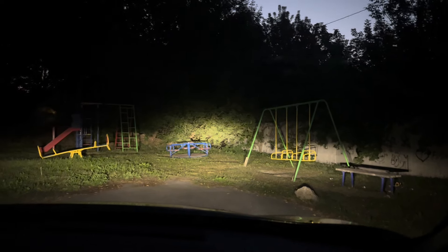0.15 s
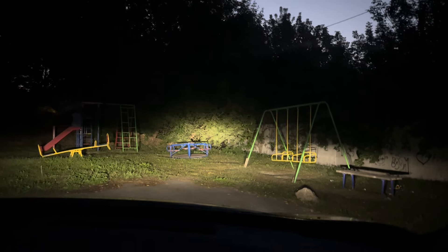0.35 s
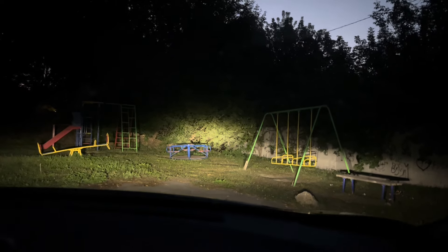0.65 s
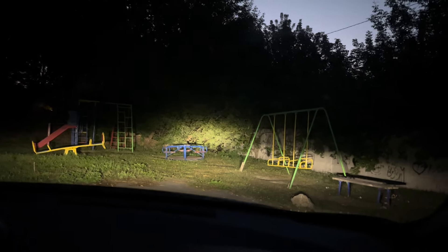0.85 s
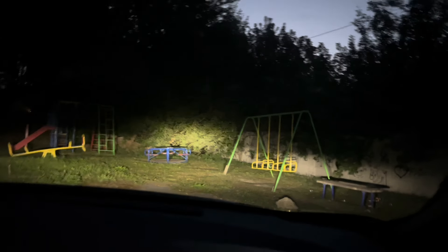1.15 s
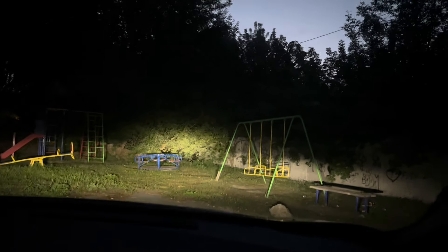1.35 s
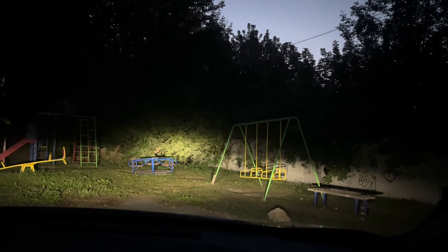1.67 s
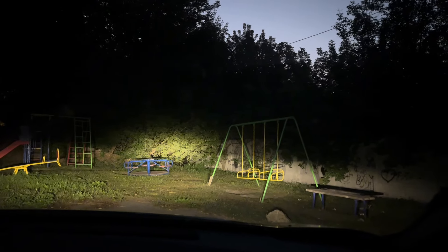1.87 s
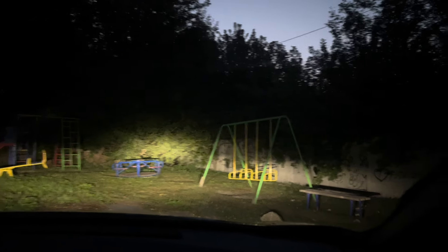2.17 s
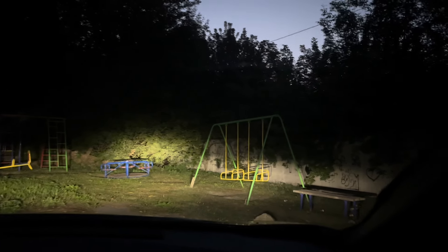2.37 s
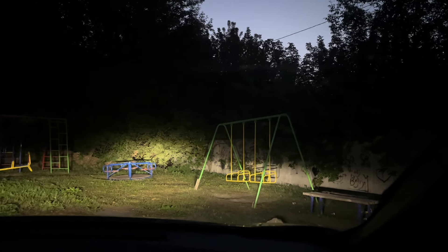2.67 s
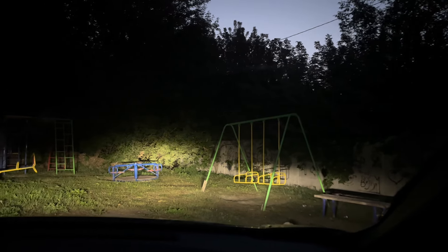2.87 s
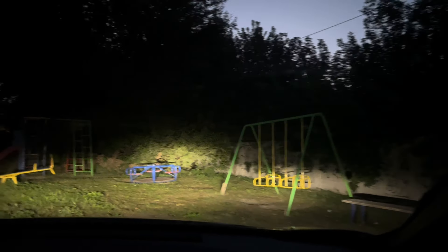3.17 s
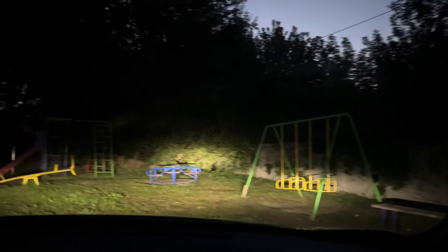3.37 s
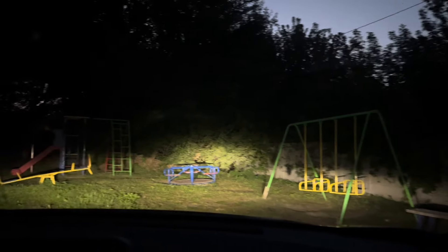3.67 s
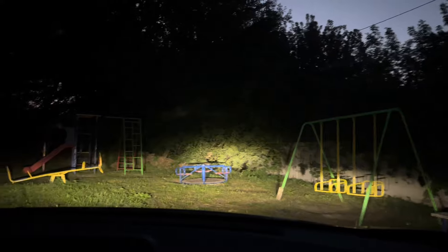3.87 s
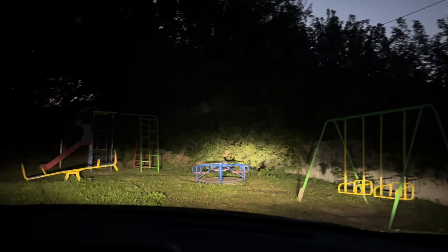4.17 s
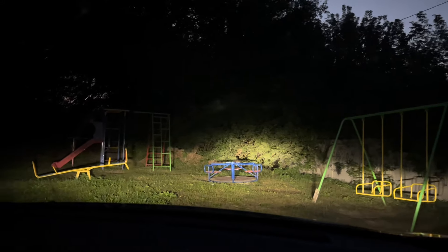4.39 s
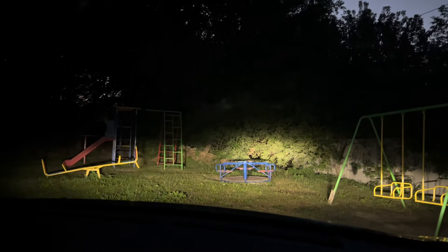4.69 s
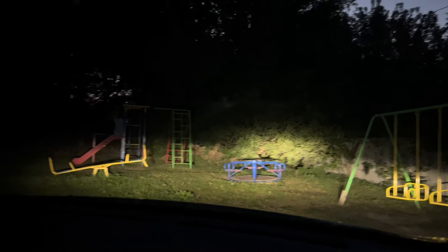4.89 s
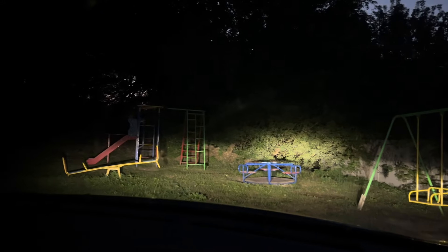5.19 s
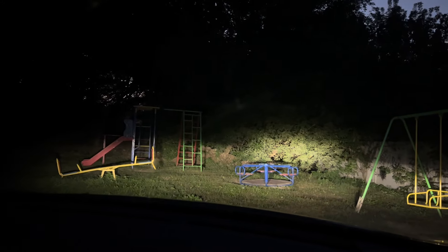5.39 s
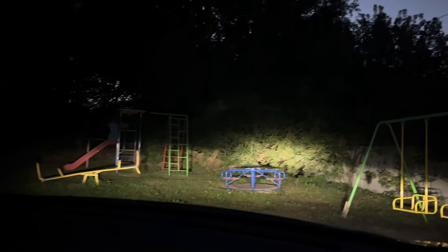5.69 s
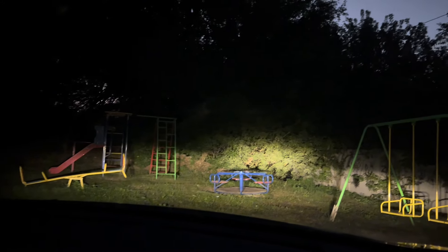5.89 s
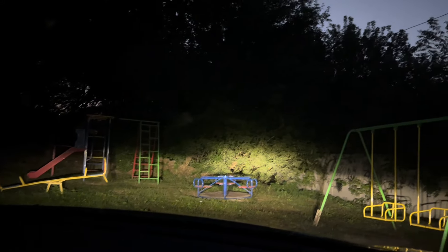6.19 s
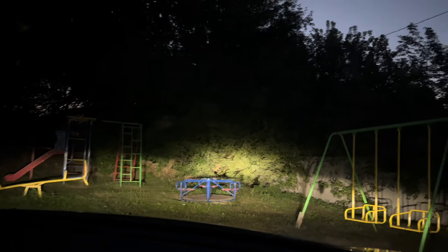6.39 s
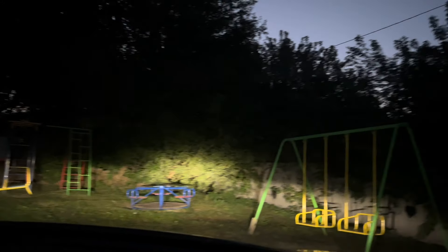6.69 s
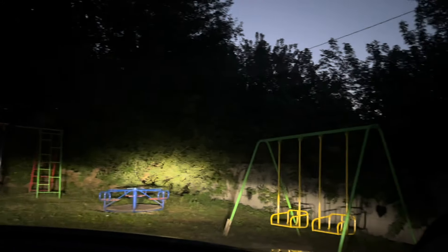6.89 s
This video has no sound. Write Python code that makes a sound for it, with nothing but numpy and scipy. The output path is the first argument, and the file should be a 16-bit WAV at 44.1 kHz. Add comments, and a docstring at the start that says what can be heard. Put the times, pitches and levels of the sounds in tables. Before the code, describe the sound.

Heard from inside a car creeping along at idle, with the microphones near the door. A low, boomy engine and road rumble starts fuller and eases by 0.6 s. At about 0.1 s there is a sharp brush and knock, then small rubs and ticks; a dull knock comes near 0.9 s, and a tight cluster of bright plastic switch snaps and scrapes at 1.05-1.15 s. Mostly quiet rumble follows, with a soft knock around 2.2 s. At 2.56-2.65 s strong clunks accompany the window glass jerking free, and its motor hums low and buzzy, sagging slightly, then recovering, while glass hisses on the seals. The rumble swells and outside wash widens in. At 4.5 s the motor stops with a solid thump. A light tick comes at 5.1 s, and faint, high bush cricket chirps pulse in two phrases from 5.1 s to about 7 s over soft rumble.

```python
"""Low road rumble, as filtered noise, fills a car creeping along at idle. Hands brush the trim as grainy
hiss, with knocks and ticks of decaying modes; switches snap as short plastic rings. Then the electric
window jerks free: its motor hums in shaft orders, its glass hisses along the seals, and road wash, noise
too, grows through the gap. It thumps to a stop, and a bush cricket chirps in bursts of high noise."""
import sys
import numpy as np
from scipy import signal
from scipy.fft import rfft, irfft
from scipy.io import wavfile
from scipy.ndimage import uniform_filter1d

SR = 44100
rng = np.random.default_rng(int(sys.argv[2]) if len(sys.argv) > 2 else 0)


def to_wav(sig):
    """Store sig (one row per channel, or 1-D mono) as 16-bit WAV at the path in sys.argv[1].

    Samples outside -1..1 are clipped; the rate is SR.
    """
    pcm = np.clip(np.atleast_2d(sig), -1, 1) * 32767
    pcm = np.round(pcm).astype(np.int16)
    wavfile.write(sys.argv[1], SR, pcm.T)  # frames by channels


N = 310905
T = np.arange(N) / SR  # seconds

# The microphone pair. Each row: frequency in Hz, level of left over right in dB.
LEFT_RIGHT_LEAN = [(60, -2), (250, 0), (650, -4), (1300, -2), (2400, -2.5), (4400, 3), (8100, -0.5),
                   (15000, 0)]
# Likeness of diffuse noise at the two microphones. Each row: frequency in Hz, correlation from 0 to 1.
LIKENESS = [(60, 1), (150, 0.92), (280, 0.64), (480, 0.27), (900, 0.54), (2000, 0.42), (4000, 0.053),
            (8000, 0.27), (13000, 1)]
# Phase by direction of arrival: from the door, from outside, and from all round for the rumble.
# Each row: frequency in Hz, lead of the left microphone in radians.
DOOR_PHASE = [(0, 0), (90, -.15), (240, -.85), (390, -1.1), (500, -1.7), (620, -2.6), (1000, -2.4),
              (1720, -2.7), (3360, -6.4), (9730, -21.5), (16500, -32)]
OUTSIDE_PHASE = [(0, 0), (390, -.3), (520, -2.8), (1000, -3.1), (2580, -5.1), (6460, -5.8), (8440, 0),
                 (16500, -12.6)]
CABIN_PHASE = [(0, 0), (SR, 0)]
EDGE_HZ = 15900  # upper band limit

# Body rumble from engine and tyres. Each row: time in seconds, level in dB (only its changes count).
RUMBLE_LEVEL = [(0, -40), (0.299, -43.5), (0.602, -52.5), (2.299, -49), (2.83, -43.5), (3.701, -42),
                (4.199, -46.5), (6.2, -49.5), (7.05, -50)]
# Spectrum of the rumble. Each row: frequency in Hz, relative level in dB.
RUMBLE_COLOUR = [(18, -33.5), (32, -22.5), (48, 6.5), (75, -7.5), (120, -4.5), (200, -15), (300, -21.5),
                 (450, -26.5), (750, -37.5), (900, -45.5), (2400, -52), (2900, -62.5), (9000, -63),
                 (10500, -76)]
RUMBLE_DB, RUMBLE_CORNER_HZ = -43.5, 450

# Wash through the widening gap above the glass. Each row: time in seconds, level in dB.
OUTSIDE_LEVEL = [(2.7, -66), (3.3, -56), (4.5, -49.5), (7.05, -52)]
# Spectrum of the wash. Each row: frequency in Hz, relative level in dB.
OUTSIDE_COLOUR = [(150, -2.5), (260, -1), (330, -11.5), (560, -19), (660, -6.5), (790, -9), (830, -1.5),
                  (870, -12.5), (1080, -11), (1200, -12.5), (1500, -19.5), (2400, -29.5), (3200, -47.5),
                  (7500, -99), (10000, -77)]

# Chorus of far crickets. Each row: time in seconds, level in dB.
CHORUS_LEVEL = [(4.55, -90), (4.95, -84), (5.05, -77), (5.8, -81), (5.9, -93), (6.5, -91), (7.05, -80)]
# Bush cricket phrases of evenly spaced chirps.
# Each row: start in seconds, chirp gap in seconds, first chirp in dB, growth in dB per chirp.
PHRASES = [(5.08, .1045, -70, 0), (5.781, .1095, -72.5, 0.6)]
CHIRP_COUNTS, CHIRP_SCATTER_DB = (7, 12), .8
STROKE_GAP_S, STROKE_RISE_S, STROKES_DB = .032, .011, [-1, 0, -7]  # three wing strokes to a chirp
# Resonance of the wing. Each row: frequency in Hz, relative level in dB.
WING_COLOUR = [(7000, -34), (8000, -19), (8500, -7), (9000, -1), (9450, 0), (9900, -5), (10300, -17),
               (11300, -16), (13000, -30)]

# Tiny ticks of loose trim. Each row: start in seconds, level in dB, pitch in Hz.
TICKS = [(.441, -62, 3150), (.525, -66, 3000), (.679, -57, 1800), (.967, -61, 1700), (5.116, -50, 2400)]
TICK_T60 = .016  # seconds

# Fingers and cloth rubbing the trim. Each row: start in seconds, length in seconds, hiss level in dB,
# hiss centre in Hz, trim resonance level in dB.
RUBS = [(0.024, 0.084, -55.5, 3280, -57.5), (0.063, 0.012, -25.5, 3650, -41.5),
        (0.083, 0.33, -72.5, 4780, -76), (0.174, 0.043, -55, 870, -70), (0.253, 0.016, -62.5, 4200, -64),
        (0.792, 0.033, -68.5, 6200, -55), (0.849, 0.093, -69, 3020, -63), (0.873, 0.018, -47, 920, -66),
        (1.203, 0.037, -67.5, 4770, -73), (1.277, 0.085, -70, 4850, -63.5),
        (1.403, 0.078, -75, 5050, -67.5), (1.608, 0.026, -77.5, 4560, -72),
        (1.972, 0.013, -70.5, 7710, -97), (2.092, 0.091, -74, 4400, -76),
        (2.153, 0.046, -60.5, 1850, -56.5), (2.52, 0.019, -59, 4130, -65), (2.549, 0.05, -49.5, 1513, -58),
        (2.613, 0.033, -42, 2830, -45.5), (4.505, 0.019, -46, 2560, -33.5),
        (4.546, 0.093, -69.5, 4150, -87), (5.066, 0.13, -60, 4630, -86), (5.193, 0.086, -73.5, 5000, -87)]
HISS_OCTAVES, TRIM_HZ, TRIM_OCTAVES = 0.85, 1490, 0.4
# The switch scraping in its slot. Each row: start in seconds, length in seconds, level in dB.
SCRAPES = [(1.059, 0.055, -45.5), (1.118, 0.016, -53)]
# Spectrum of the scrape. Each row: frequency in Hz, relative level in dB.
SCRAPE_COLOUR = [(700, -1), (1300, -7), (1750, 1), (2400, -10), (3000, -20), (4000, -8), (5200, -22),
                 (6300, -15), (7500, -23), (8200, 7.5), (10200, -3.5), (11500, -30)]

# A plastic switch snapping. Each row: start in seconds, level in dB, brightness in dB an octave.
SNAPS = [(0.796, -47, -6), (1.0535, -33.5, -.5), (1.06, -39, -3), (1.066, -51, 5), (1.0715, -39, -1.5),
         (1.085, -57, 6), (1.1345, -39, -5)]
# Modes of the switch. Each row: frequency in Hz, relative level in dB, 60 dB decay time in seconds.
SWITCH_MODES = [(430, -11, .05), (720, -7, .03), (1300, -7, .03), (1700, 0, .035), (2150, -8, .02),
                (4000, -17, .012), (8300, 1, .012), (10200, -6, .01)]

# Knocks on trim and door. Each row: start in seconds, crack level in dB, panel level in dB,
# boom level in dB (relative), boom centre in Hz, 60 dB decay time of the boom in seconds.
KNOCKS = [(.071, -36.5, -39, -19.5, 127, 0.071), (.184, -58, -40, -29.5, 188.7, 0.17),
          (.198, -72, -49.5, -28.5, 92.5, 0.46), (0.88, -54, -34.5, -32.5, 87.5, 0.36),
          (.883, -76, -41, -42.5, 375, 0.28), (2.158, -48.5, -54, -64, 89.5, .2),
          (2.176, -65, -48, -34.5, 86.8, 0.57), (2.561, -28, -28, -30, 167, 0.51),
          (2.582, -25.5, -30.5, -22, 74.5, 0.25), (2.629, -27, -31.5, -24, 88.6, 0.45),
          (3.138, -62, -40.5, -29.5, 85.6, 0.34), (3.478, -70, -45, -38.5, 370, 0.087),
          (4.5, -38, -35.5, -50, 128.2, 0.12), (4.509, -65, -27, -46, 128, 0.12),
          (4.525, -46.5, -37.5, -24.5, 105, 0.23), (4.593, -79, -70, -30.5, 51.4, 0.35)]
# Modes of the panel. Each row: frequency in Hz, relative level in dB, 60 dB decay time in seconds.
PANEL_MODES = [(189.6, -3.5, 0.23), (266.8, -1, 0.17), (295, 11, 0.013), (386, -5, 0.13),
               (535, -3.5, 0.057), (862, 4.5, 0.031), (1173, 6.5, 0.014), (2420, -19.5, 0.042)]
# Air and body modes that boom, each a frequency in Hz.
CABIN_HZ = [48, 67.5, 78.5, 100.7, 110, 127.8, 172.6, 214, 327, 370]
# Spectrum of the crack. Each row: frequency in Hz, relative level in dB.
CRACK_COLOUR = [(400, -20.5), (750, -18), (1000, 8.5), (1500, -5), (2000, 3.5), (2700, -6.5), (4200, -11.5),
                (6300, -11.5), (9000, -16), (11000, -22), (16000, -31)]
CRACK_T60, BOOM_TRIM_DB = 0.073, 5.5

# Glass sliding in its seals. Each row: time in seconds, level in dB once the jerk is over.
SLIDE_LEVEL = [(2.681, -40.5), (2.8, -45.5), (3.5, -44.5), (3.8, -46), (4.049, -48.5), (4.451, -52),
               (4.512, -51.5)]
# Spectrum of the sliding, before its tilt. Each row: frequency in Hz, relative level in dB.
SLIDE_COLOUR = [(150, -2), (350, 9), (520, -4.5), (780, -2.5), (1000, -1.5), (1500, -2), (2200, -3.5),
                (3200, -7), (4500, -12.5), (6500, -10.5), (9200, -14), (10500, -25.5), (16000, -23.5)]
# the glass breaks free loud and dull; tilts in dB an octave
JERK_S, JERK_DB, JERK_FADE_S, JERK_TILT_DB, SLIDE_TILT_DB = 2.56, 6.5, 0.067, -4.5, 2

# Shaft speed of the window motor, before smoothing by inertia. Each row: time in seconds, turns in Hz.
SPEED = [(2.599, 118), (2.674, 126.1), (2.74, 126.8), (2.827, 125.9), (3.121, 119.9), (3.251, 121.1),
         (3.603, 115.1), (3.72, 117.6), (3.881, 124.2), (4.131, 126.3), (4.249, 126.5), (4.362, 117.6),
         (4.51, 114)]
FREE_HZ, SURGE_S, INERTIA_S = 133.8, 0.028, .1
# Main multiples of the shaft speed.
MAIN_ORDERS = (1, 2, 4)
# Strength of each main order. Each row: level in dB, change in dB per Hz of slowing, drift in dB a second,
# start surge in dB, waver in dB.
ORDER_LAWS = [(-51.5, 0.3661, 3, 31.5, 2.5), (-41.5, 0.07, -0.4, 0.5, 0.75), (-36, -0.62, -5.5, 12.5, 0.9)]
# Faint upper orders that swell and fade at moments along the travel.
# Each row: multiple of shaft speed, relative level in dB, loudest moment in seconds, spread in seconds.
UPPER_ORDERS = [(5, -53, 2.8, .15), (8, -55, 2.95, .2), (8, -53, 3.65, .2), (10, -53.5, 3.1, .35),
                (10, -53, 3.75, .06), (9, -54, 3.15, .25), (11, -53.5, 4.08, .13), (11, -54, 3.1, .2),
                (20, -60, 3.1, .11), (20, -59, 3.48, .1), (20, -59, 4.14, .1), (20, -54, 4.48, .04)]
UPPER_TRIM_DB = -2.5
# Orders that sing when the motor runs free and fade as load slows it.
# Each row: multiple of shaft speed, level in dB at free speed, loss in dB per Hz of slowing.
FREE_ORDERS = [(8, -54, 1.2), (9, -59, 1.2)]


def amp(db):
    """Definition of the decibel: amplitude ratio from level."""
    return 10 ** (np.asarray(db) / 20)


def evened(x):
    """Normalisation to unit root mean square."""
    return x / np.sqrt(np.mean(x ** 2) + 1e-20)


def read(points, hz):
    """Interpolation of a table along a logarithmic frequency axis."""
    f, value = np.transpose(points)
    return np.interp(np.log(hz + 1), np.log(f + 1), value)


def add(mix, s, sound):
    """Superposition of a sound on the mix from s seconds onward."""
    part = mix[..., round(s * SR):][..., :sound.shape[-1]]
    part += sound[..., :part.shape[-1]]


def wander(hz, size=N):
    """Random modulation: twice-averaged noise of rms 1, changing about hz times a second."""
    span = max(int(SR / hz), 2)
    once = uniform_filter1d(rng.standard_normal(size), span)
    return evened(uniform_filter1d(once, span))


def level(rows):
    """Envelope: gain over time from rows of seconds and dB; inaudible before the first."""
    s, db = np.transpose(rows)[:2]
    return amp(np.interp(T, s, db, left=-200))


def pair(hz, phase):
    """Interaural principle: complex gains, in level and phase, from one source to two microphones."""
    lean = amp(read(LEFT_RIGHT_LEAN, hz) / 2) * np.exp(.5j * np.interp(hz, *np.transpose(phase)))
    return np.array([lean, 1 / lean])


def placed(x, phase):
    """Coherent reception: a single source as the two microphones take it."""
    return irfft(rfft(x) * pair(np.fft.rfftfreq(N, 1 / SR), phase), N)


def hiss(colour_db, phase, patchy_db, size=1024):
    """Partly coherent noise: random short-time spectra of magnitude colour_db(hz, t), in drifting patches."""
    frames, hz = N * 4 // size + 5, np.fft.rfftfreq(size, 1 / SR)[:, None]
    a, b, c, d, patches = rng.standard_normal((frames, len(hz), 5)).T
    patches = uniform_filter1d(patches, size=4, axis=0)  # across frequency
    patches = evened(uniform_filter1d(patches, size=14, axis=1))  # across time
    same = np.clip(read(LIKENESS, hz), 0, 1)
    left = a + 1j * b
    right = same * left + np.sqrt(1 - same ** 2) * (c + 1j * d)
    spectra = np.array([left, right]) * pair(hz, phase)
    spectra *= amp(colour_db(hz, np.arange(frames) * size / 4 / SR) + patchy_db * patches)
    return evened(signal.istft(spectra, nperseg=size, noverlap=size * 3 // 4)[1][:, :N])


def rumble():
    """Structure-borne noise: the bass follows bumps in the road fully, the quiet cabin treble hardly at all."""
    s, db = np.transpose(RUMBLE_LEVEL)

    def colour(hz, t):
        follows = 1 / (1 + (hz / RUMBLE_CORNER_HZ) ** 2)
        return read(RUMBLE_COLOUR, hz) + follows * (np.interp(t, s, db) - np.median(db))

    return amp(RUMBLE_DB) * hiss(colour, CABIN_PHASE, patchy_db=2.5, size=2048)


def outside():
    """Airborne transmission through an aperture: tyre and engine wash as coloured noise."""
    wash = hiss(lambda hz, t: read(OUTSIDE_COLOUR, hz), OUTSIDE_PHASE, patchy_db=3.0, size=2048)
    return wash * level(OUTSIDE_LEVEL)


def cricket():
    """Stridulation: wing strokes are bursts of noise in the wing's band; far neighbours blur into a chorus."""
    strokes = level(CHORUS_LEVEL) * amp(1.4 * wander(39))
    for (start, gap, db, growth_db), count in zip(PHRASES, CHIRP_COUNTS):
        for n, chance in enumerate(rng.standard_normal(count)):
            chirp_db = db + n * growth_db + CHIRP_SCATTER_DB * chance
            for k, stroke_db in enumerate(STROKES_DB):
                u = np.maximum(T - start - n * gap - k * STROKE_GAP_S, 0) / STROKE_RISE_S
                strokes += amp(chirp_db + stroke_db) * u * np.exp(1 - u)
    return hiss(lambda hz, t: read(WING_COLOUR, hz), OUTSIDE_PHASE, patchy_db=1.5, size=256) * strokes


def ticks():
    """Free vibration: each tick is one short decaying plastic mode."""
    out, t = np.zeros(N), T[:SR // 20]
    for s, db, hz in TICKS:
        decay = amp(db - 60 * t / TICK_T60)
        add(out, s, decay * np.sin(2 * np.pi * hz * t) * (1 - np.exp(-t / 0.00053)))
    return placed(out, DOOR_PHASE)


def stroke(length, db, band):
    """Stick-slip friction: noise of magnitude band(hz) made grainy, quick to start and slower to fade."""
    t = T[:int((length + .06) * SR)]
    hz = np.fft.rfftfreq(len(t), 1 / SR)
    a, b = rng.standard_normal((2, SR // 2))[:, :len(t)]
    both = [a, 0.18 * a + 0.71 * b]  # right is only partly like left
    noise = evened(irfft(rfft(both) * band(hz) * pair(hz, DOOR_PHASE), len(t)))
    grain = amp(4 * wander(250, size=SR // 2)[:len(t)])
    attack = np.clip(t / (.15 * length), 0, 1)
    fade = amp(-8 * t / length - 900 * np.maximum(t - length, 0))
    return amp(db) * noise * evened(grain) * attack * fade


def bell(centre_hz, octaves):
    """Band-pass radiation: a bell over log frequency that rolls off above 11.5 kHz."""
    def band(hz):
        away = np.log2(hz / centre_hz + 1e-3) / octaves
        return np.exp(-.5 * away ** 2) / (1 + (hz / 11500) ** 6)
    return band


def rubs():
    """Friction exciting a resonator: broad hiss plus the narrower trim band; the switch scrapes in its slot."""
    out = np.zeros((2, N))
    for s, length, hiss_db, centre_hz, trim_db in RUBS:
        rub = stroke(length, hiss_db, bell(centre_hz, HISS_OCTAVES))
        trim = stroke(length, trim_db, bell(TRIM_HZ, TRIM_OCTAVES))
        add(out, s, rub + trim)
    for s, length, db in SCRAPES:
        add(out, s, stroke(length, db, lambda hz: amp(read(SCRAPE_COLOUR, hz))))
    return out


def switch():
    """Modal synthesis: each snap rings the same short plastic modes, a little detuned."""
    out, t = np.zeros(N), T[:SR // 10]
    detunes = rng.uniform(-1, 1, (len(SNAPS), len(SWITCH_MODES)))
    for (s, db, tilt_db), detune in zip(SNAPS, detunes):
        ring = np.zeros(len(t))
        for (hz, mode_db, t60), d in zip(SWITCH_MODES, detune):
            strength_db = mode_db + tilt_db * np.log2(hz / 1700) + 2 * d
            ring += amp(strength_db - 60 * t / t60) * np.sin(2 * np.pi * hz * (1 + .05 * d) * t)
        add(out, s, amp(db) * ring * (1 - np.exp(-(t / .0006) ** 2)))
    return placed(out, DOOR_PHASE) * amp([[-1.5], [1.5]])  # leans right


def knocks():
    """Impact response: a noisy crack, a panel ring, and a later-swelling boom of the nearest cabin modes."""
    crack = hiss(lambda hz, t: read(CRACK_COLOUR, hz), DOOR_PHASE, patchy_db=2.5, size=256)
    out, body, t = np.zeros((2, N)), np.zeros(N), T[:SR // 2]
    turns = rng.random((len(KNOCKS), len(PANEL_MODES) + len(CABIN_HZ)))  # starting phases
    for (s, crack_db, panel_db, boom_db, boom_hz, boom_t60), phases in zip(KNOCKS, turns):
        noise = crack[:, round(s * SR):][:, :len(t)]
        add(out, s, noise * amp(crack_db - 60 * t / CRACK_T60) * (1 - np.exp(-t / 0.0004)))

        ring = np.zeros(len(t))
        for (hz, db, t60), p in zip(PANEL_MODES, phases):
            ring += amp(db - 60 * t / t60) * np.sin(2 * np.pi * (hz * t + p))
        add(body, s, amp(panel_db) * ring * (1 - np.exp(-(t / .001) ** 2)))

        boom = np.zeros(len(t))
        for hz, p in zip(CABIN_HZ, phases[::-1]):
            nearness = np.exp(-.5 * (np.log2(hz / boom_hz) / .18) ** 2)
            boom += nearness * np.sin(2 * np.pi * (hz * t + .3 * p))
        decay = amp(boom_db + BOOM_TRIM_DB - 60 * t / boom_t60)
        add(body, s, decay * boom * (1 - np.exp(-t / 0.011)))
    return out + placed(body, DOOR_PHASE)


def slide():
    """Sliding friction: dense, faintly grainy hiss from the jerk that frees the glass until it stops."""
    s, db = np.transpose(SLIDE_LEVEL)

    def jerk(t):
        return np.clip((s[0] - t) / JERK_FADE_S, 0, 1)

    def colour(hz, t):
        tilt_db = SLIDE_TILT_DB + JERK_TILT_DB * jerk(t)
        return read(SLIDE_COLOUR, hz) + tilt_db * np.log2(hz / 3000 + 0.096)

    moving = (T > JERK_S) * np.clip((s[-1] - T) / 0.018, 0, 1)
    friction = hiss(colour, DOOR_PHASE, patchy_db=3.0)
    return friction * amp(np.interp(T, s, db) + JERK_DB * jerk(T) + 0.47 * wander(250)) * moving


def motor():
    """Rotational harmonics: shaft orders whose strength follows the load; upper ones flutter, come and go."""
    s, hz = np.transpose(SPEED)
    speed = uniform_filter1d(np.interp(T, s, hz), size=round(INERTIA_S * SR))
    since = np.maximum(T - s[0], 0)
    slowing = FREE_HZ - speed
    turns = np.cumsum(speed * (1 + 0.00336 * wander(19.7))) / SR
    hum = np.zeros(N)
    for k, (db, load_db, drift_db, surge_db, waver_db) in zip(MAIN_ORDERS, ORDER_LAWS):
        strength_db = db + load_db * slowing + drift_db * since + surge_db * np.exp(-since / SURGE_S)
        hum += amp(strength_db + waver_db * wander(14)) * np.sin(2 * np.pi * (k * turns + rng.random()))
    for k, db, at, spread in UPPER_ORDERS:
        swell = amp(db + UPPER_TRIM_DB + 2.8 * wander(30)) * np.exp(-.5 * ((T - at) / spread) ** 2)
        hum += swell * np.sin(2 * np.pi * (k * turns + .07 * wander(30)))
    for k, db, load_db in FREE_ORDERS:
        strength = amp(db - load_db * slowing + 3.2 * wander(30))
        hum += strength * np.sin(2 * np.pi * (k * turns + .07 * wander(30)))
    running = np.clip((T - s[0]) / 0.0064, 0, 1) * np.clip((s[-1] - T) / 0.0029, 0, 1)
    return placed(np.sqrt(2) * hum * running, DOOR_PHASE)  # root 2: order levels are rms


def scene():
    """Linear superposition of all the sources."""
    background = rumble() + outside() + cricket()
    hands = ticks() + rubs() + switch() + knocks()
    window = slide() + motor()
    return background + hands + window


def record(dry):
    """Band limitation: a linear-phase low-pass at the upper edge."""
    low_pass = signal.firwin(511, EDGE_HZ, window=("kaiser", 9), fs=SR)
    return signal.oaconvolve(dry, low_pass[None], "same")


dry = scene()
out = record(dry)
to_wav(out)
```